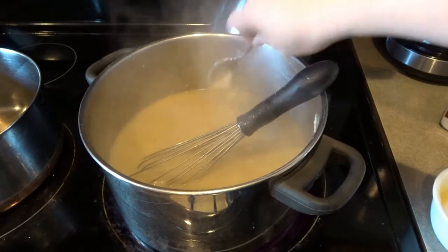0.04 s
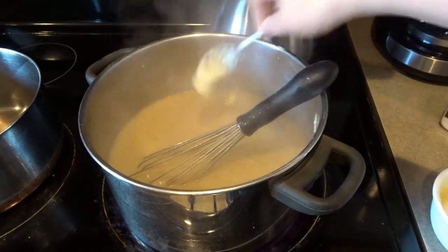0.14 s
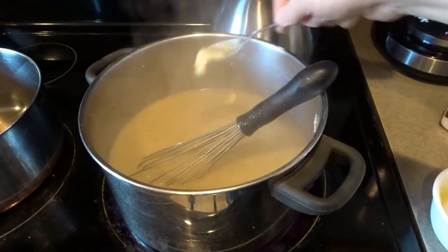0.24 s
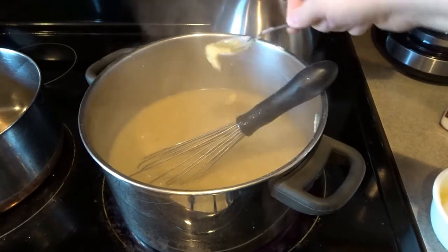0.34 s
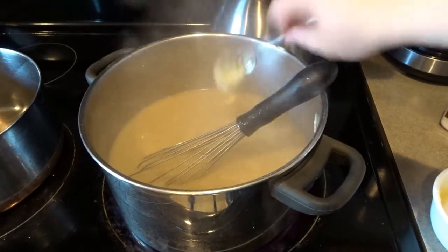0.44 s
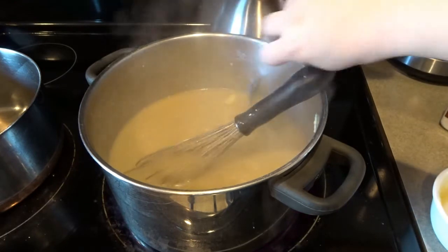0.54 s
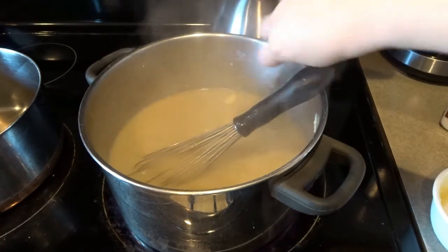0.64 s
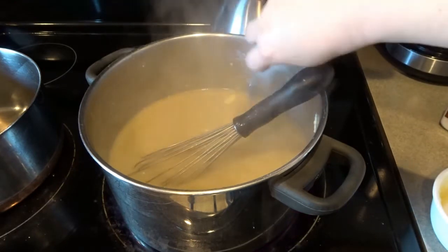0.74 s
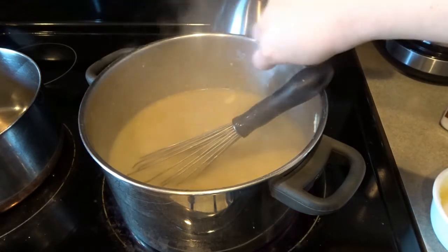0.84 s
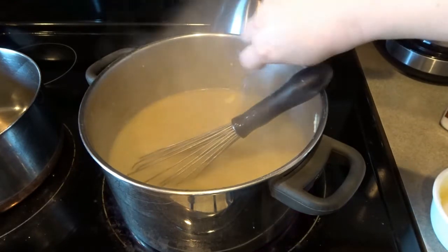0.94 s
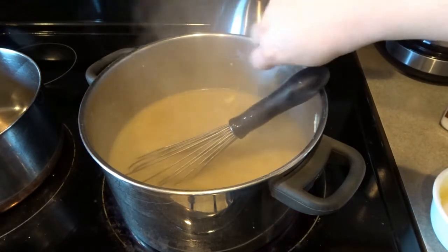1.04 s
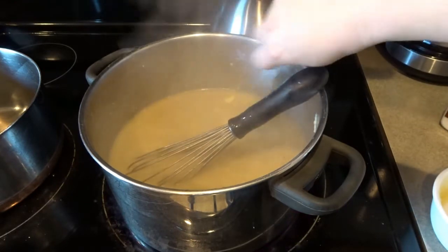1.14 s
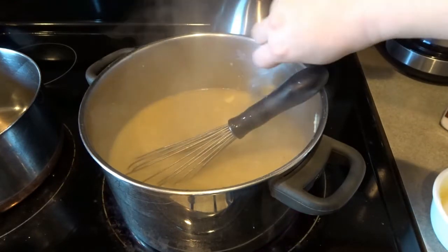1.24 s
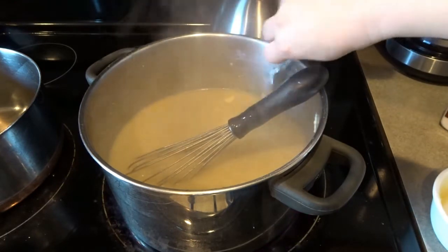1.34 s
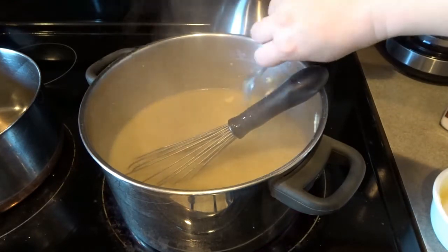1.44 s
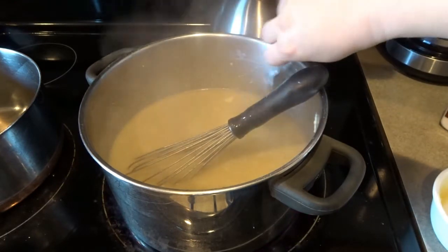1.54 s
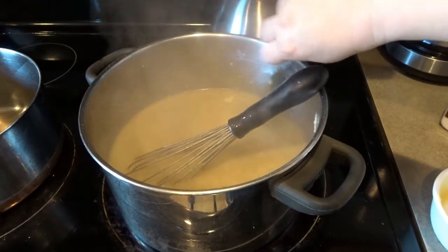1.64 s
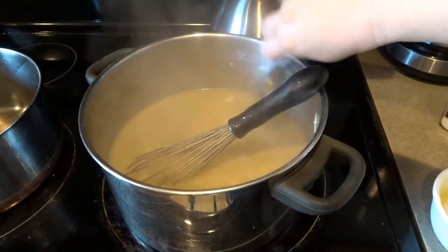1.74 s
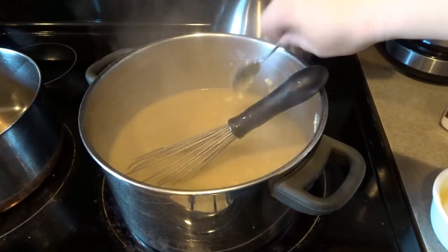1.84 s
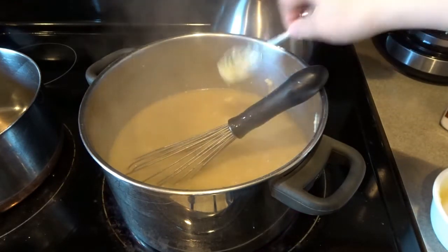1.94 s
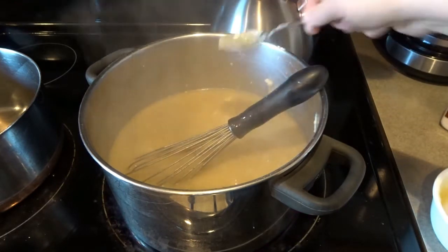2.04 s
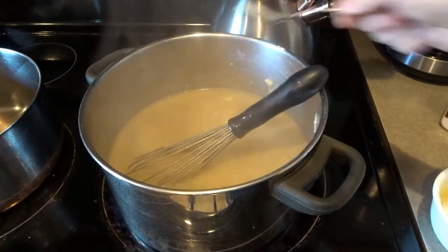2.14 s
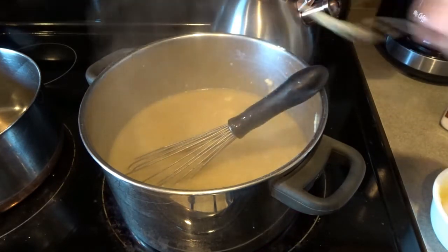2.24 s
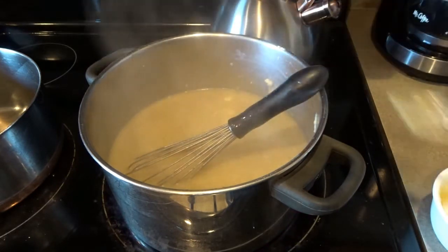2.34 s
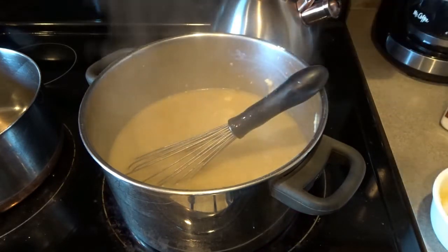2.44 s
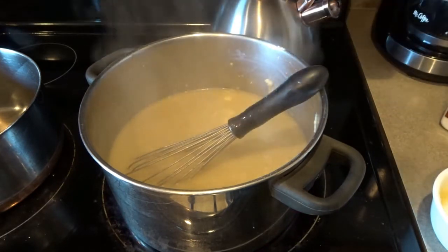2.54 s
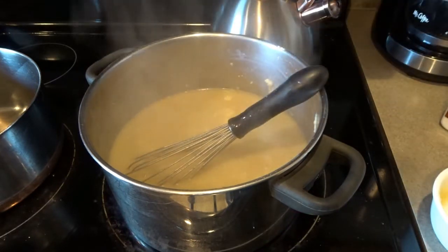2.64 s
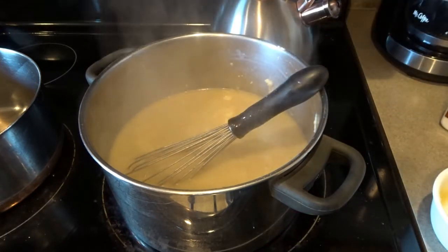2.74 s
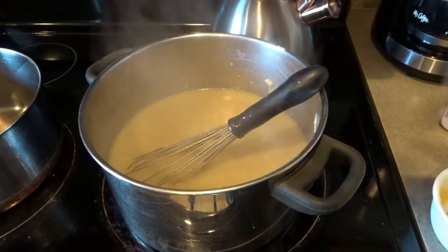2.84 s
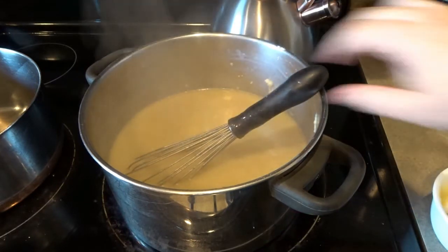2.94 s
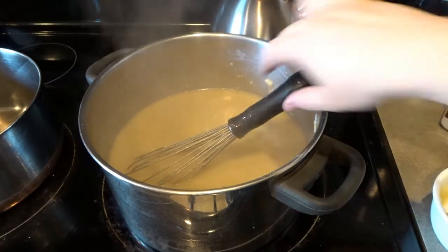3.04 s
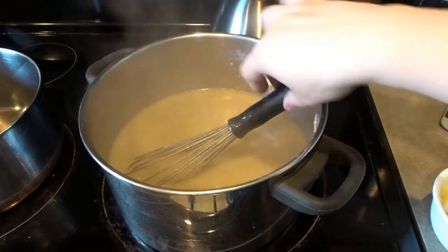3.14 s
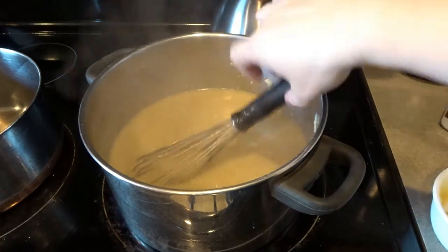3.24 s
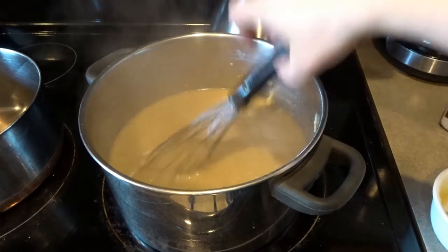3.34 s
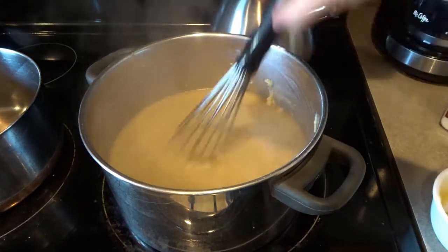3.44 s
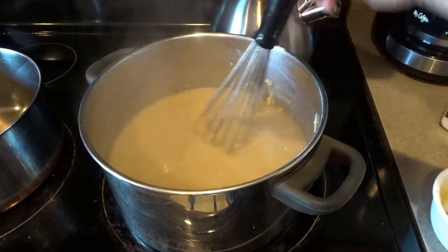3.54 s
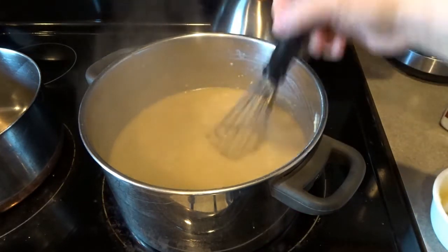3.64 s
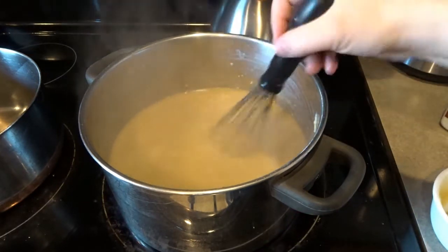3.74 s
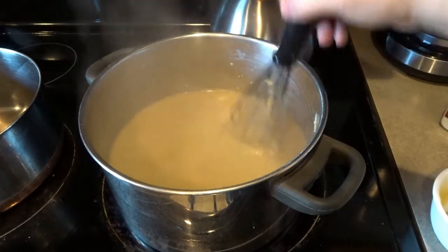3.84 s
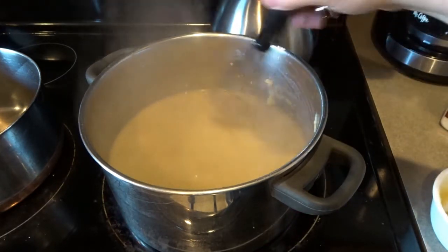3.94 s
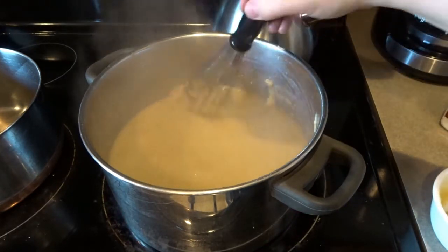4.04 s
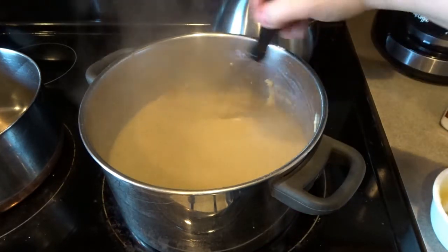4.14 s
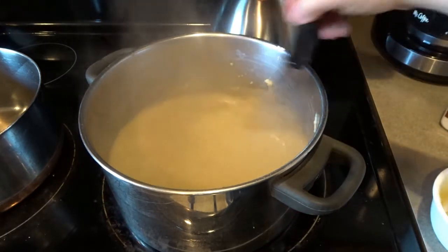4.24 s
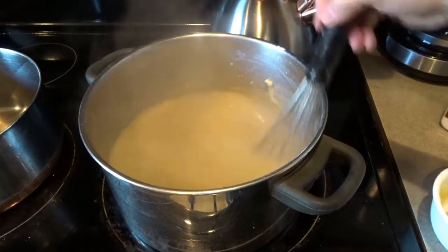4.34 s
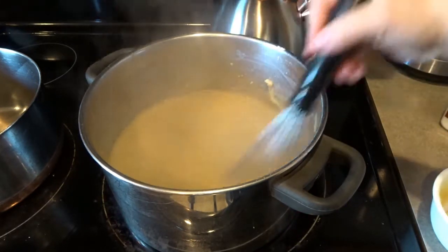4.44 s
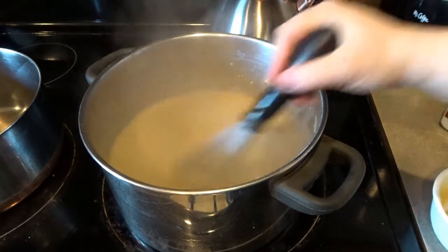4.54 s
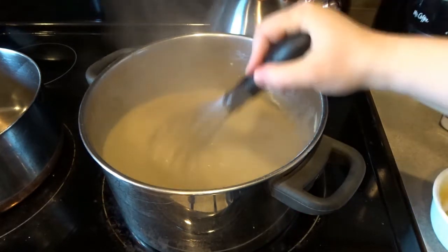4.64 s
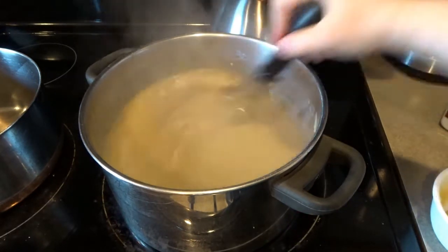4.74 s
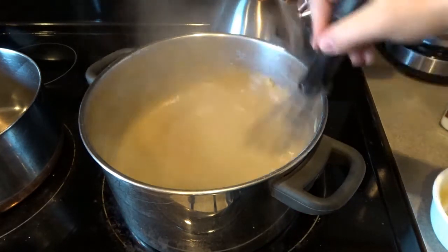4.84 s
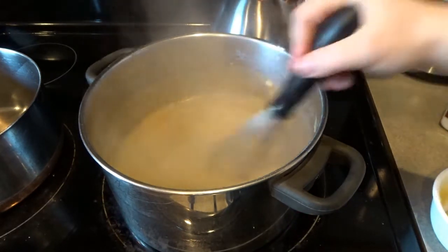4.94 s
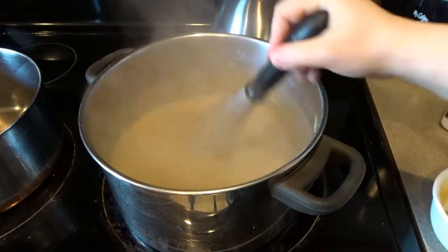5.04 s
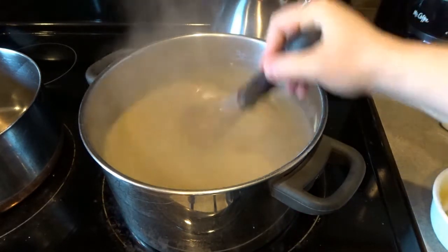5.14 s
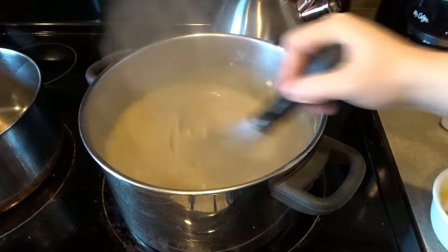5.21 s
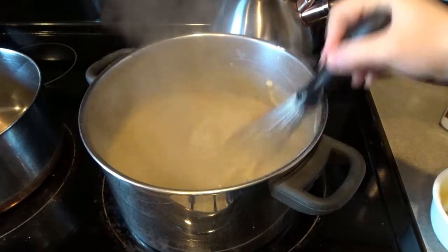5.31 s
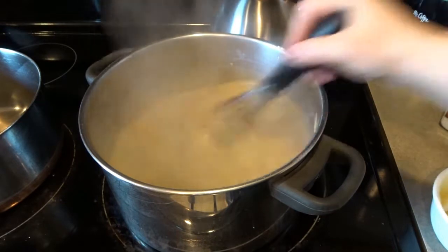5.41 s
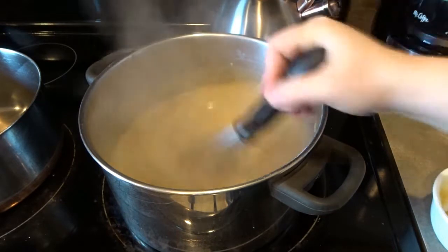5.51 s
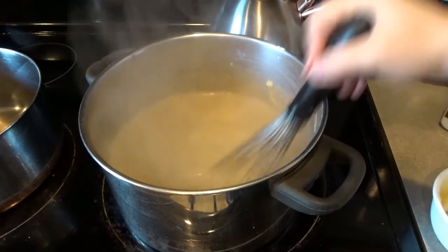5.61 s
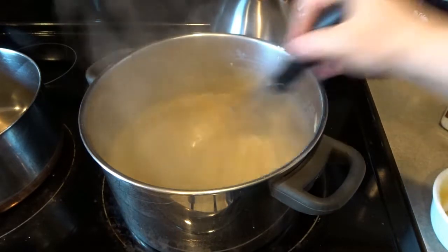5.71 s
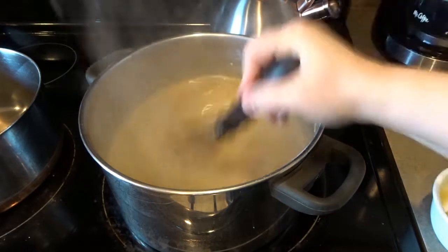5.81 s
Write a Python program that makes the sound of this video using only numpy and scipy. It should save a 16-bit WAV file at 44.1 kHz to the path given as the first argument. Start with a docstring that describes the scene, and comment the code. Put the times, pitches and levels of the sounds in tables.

```python
"""Spoon and whisk on a sauce pot

A spoon is rapped seven times on the rim of a steel pot of thick sauce and laid down; then a wire whisk knocks
the pot and scrapes round it. Blows are noise clicks and dying sines; scrapes are random slips through resonances.
The sauce ticks faintly with short sine pops over mains hum and shaped air noise. A noise tail is the small kitchen."""
import sys
import numpy as np
from scipy import signal
from scipy.io import wavfile
from scipy.ndimage import uniform_filter1d

SR = 44100
rng = np.random.default_rng(int(sys.argv[2]) if len(sys.argv) > 2 else 0)


def store_pcm(level_fs):
    """Save levels as 16-bit WAV."""
    pcm = np.round(np.clip(level_fs, -1, 1) * 32767).astype(np.int16)
    wavfile.write(sys.argv[1], SR, np.atleast_2d(pcm).T)


N = 259023
LEAD = SR // 5  # samples played before the start

# the lighter clack of wires and of the spoon landing: (frequency [Hz], relative level per Hz [dB])
CLACK = [(88, -68), (150, -16), (534, -7), (790, -2.5), (1120, -17.5), (1530, -7.5), (1720, -14.5),
         (2060, -8.5), (7620, -15), (16000, -26.5)]


def amp(db):
    """Decibels to a linear gain."""
    return 10 ** (np.asarray(db) / 20)


def evened(x):
    """Scales a sound to rms 1."""
    return x / np.sqrt(np.mean(x ** 2) + 1e-20)


def read(points, hz):
    """Reads a curve between its points on a log frequency scale."""
    f, value = np.transpose(points)
    return np.interp(np.log(hz + 1), np.log(f + 1), value)


def add(mix, s, sound):
    """Lays a sound into the mix at s seconds after the start."""
    part = mix[LEAD + round(s * SR):][:len(sound)]
    part += sound[:len(part)]


def causal(points, tilt_db):
    """The shortest click with the given spectrum (minimum phase), tilted round 2 kHz; energy 1."""
    hz = abs(np.fft.fftfreq(4096, 1 / SR))
    tilted_db = read(points, hz) + tilt_db * np.log2((hz + 50) / 2000)
    log_gain = np.log(amp(np.maximum(tilted_db, -100)))
    taps = np.fft.ifft(np.exp(np.conj(signal.hilbert(log_gain)))).real[:2048]
    return taps / np.linalg.norm(taps)


def ring(hz, db, t60, phase):
    """Dying sines that swell in over a few cycles; energy 1."""
    t = np.arange(SR // 2)[:, None] / SR
    decay = amp(db - 60 * t / t60)
    swell = 1 - np.exp(-t * hz / 2.5)
    out = (decay * swell * np.sin(2 * np.pi * (hz * t + phase))).sum(1)
    return out / np.linalg.norm(out)


def struck(modes, tilt_db, spread_db):
    """The modes of a body, shared out a little differently at each blow."""
    hz, db, t60 = np.transpose(modes)
    share, phase = rng.standard_normal((2, len(hz)))
    return ring(hz, db + tilt_db * np.log2(hz / 2000) + spread_db * share, t60, phase)


def landing(seconds):
    """The force of many small contacts that swells, peaks after the given time and fades; energy 1."""
    u = np.arange(3000) / SR / seconds
    burst = rng.standard_normal(3000) * u * np.exp(-u)
    return burst / np.linalg.norm(burst)


def clatter(points, tilt_db, seconds):
    """A broad click drawn out over the time of contact."""
    return signal.fftconvolve(landing(seconds), causal(points, tilt_db))


def slow(seconds, shape):
    """Random drift smoothed along the last axis, rms 1 overall."""
    span = max(round(seconds * SR), 1)
    smooth = uniform_filter1d(rng.standard_normal(shape), span)
    return evened(uniform_filter1d(smooth, span))


def pair(same, frames):
    """Random short-time spectra for left and right, as alike at each frequency as the curve says."""
    a, b, c, d = rng.standard_normal((frames, 513, 4)).T
    like = read(same, np.fft.rfftfreq(1024, 1 / SR))[:, None]
    mid = np.sqrt(1 + like) * (a + 1j * b)
    side = np.sqrt(1 - like) * (c + 1j * d)
    return np.array([mid + side, mid - side])


def kitchen(x, wet_db, left_db):
    """The direct sound, then a dense tail that builds in a few ms, each band dying at its own speed."""
    # how alike the echoes are at the two sides: (frequency [Hz], left-right likeness [-1 to 1])
    echo_likeness = [(300, 1), (700, 0.88), (1500, 0.717), (3000, 0.28), (7000, 0.067)]
    # how long the room rings: (frequency [Hz], time to fall 60 dB [s])
    room_decay = [(200, 0.43), (530, 0.32), (1390, 0.4317), (3680, 0.38), (9700, 0.37), (15000, 0.36)]
    t = np.arange(30000) / SR
    noise = signal.istft(pair(echo_likeness, 130), nperseg=1024, noverlap=768)[1][:, :len(t)]
    hz, frame_s, z = signal.stft(noise, SR, nperseg=128)
    dying = z * amp(-60 * frame_s / read(room_decay, hz)[:, None])
    tail = signal.istft(dying, SR, nperseg=128)[1][:, :len(t)]
    tail = tail * np.clip((t - 0.0005) / 0.0043, 0, 1)
    wet = signal.fftconvolve(x[None], tail / np.linalg.norm(tail[0]), axes=1)[:, :len(x)]
    balance = amp([[left_db / 2], [-left_db / 2]])  # left_db is left over right
    return ((x + amp(wet_db) * wet) * balance)[:, LEAD:]


def resonate(x, hz, width):
    """Shifts the curve hz down to zero, smooths, and shifts back: a resonance of gain 1."""
    turn = np.exp(2j * np.pi * np.cumsum(hz) / SR)
    r = np.exp(-np.pi * width / SR)
    return 2 * (turn * signal.lfilter([1 - r], [1, -r], x / turn)).real


def scrape(t, pressure_db, tilt_db, modes, song_db, fickle_db, uneven_db, bend):
    """Dense slips of uneven size give a rasp and ring the modes, each mode singing out now and then."""
    # the broad rasp of metal dragged on metal: (frequency [Hz], relative level per Hz [dB])
    rasp_spectrum = [(240, -49), (400, -7.5), (528, 4.5), (588, -20), (697, -4), (1110, -8), (1290, -7),
                     (2220, -7), (9920, -7), (16000, -12)]
    hz, width, db = np.transpose(modes)
    each_mode = (len(hz), len(t))

    sizes = amp(uneven_db * np.minimum(rng.exponential(1, len(t)), 4))
    slipping = rng.random(len(t)) < 6000 / SR  # about 6000 slips a second
    slips = rng.choice([-1., 1.], len(t)) * sizes * slipping
    slips = evened(slips) * amp(2.2 * slow(0.012, len(t)))  # slips come in clumps

    mode_tilt_db = tilt_db * np.log2(hz[:, None] / 5000)
    sing = amp(db[:, None] + fickle_db * slow(0.015, each_mode) + mode_tilt_db)
    bent = hz[:, None] * (1 + bend * slow(0.047, each_mode))  # pressing changes the pitch
    tones = sum(resonate(slips * g, f, w) for g, f, w in zip(sing, bent, width))

    bright = np.clip(0.5 + tilt_db / 6, 0, 1)  # a blend of a dull and a bright rasp
    dull_rasp, bright_rasp = (signal.oaconvolve(slips, causal(rasp_spectrum, d))[:len(t)] for d in (-3, 3))
    rasp = (1 - bright) * dull_rasp + bright * bright_rasp
    rubbed = evened(rasp + amp(song_db) * evened(tones))
    return amp(pressure_db) * rubbed * signal.windows.tukey(len(t), min(600 / len(t), 1))


def knocks():
    """The wires land one after another, so the clack is a short burst; the damped floor thuds and one wire clinks."""
    # whisk knocks on the pot, the first just before the start:
    # (time [s], blow [dB], brightness [dB per octave], clink [Hz], relative clink level [dB])
    whisk_knocks = [(-0.12, -17, 0.5, 6770, -6), (3.574, -16, -0.3, 820, -5), (3.965, -17, 3, 1070, -10),
                    (4.054, -29.5, 3.5, 3740, -8), (4.141, -30, 2, 4520, -8), (4.244, -36, 2, 6680, 6),
                    (4.303, -37, 0, 6710, 2), (4.374, -24, 0.5, 815, -24), (4.437, -29, 1.9, 1580, -17.5),
                    (4.655, -32, 2, 3740, -11), (4.695, -30, 1.5, 653.5, -14),
                    (5.267, -37.5, 0.5, 3350, -4), (5.381, -25, 2, 720, -10), (5.712, -21, 1.5, 676, -10)]
    # the floor of the pot under the sauce: (frequency [Hz], relative level [dB], time to fall 60 dB [s])
    floor_modes = [(126, 4, 0.076), (402, 7, 0.047), (752, -0.5, 0.069), (854, 0.5, 0.059),
                   (1112, -1, 0.028), (1305, -2, 0.0655), (1540, -1, 0.0277), (2027, 5, 0.027),
                   (2474, -14, 0.114), (2760, -7, 0.024), (3380, -1.5, 0.04)]
    light_db, light_landing_s = -30, 0.0028  # a light blow, and how long its wires take to reach full force
    longer_db_per_db = 0.08  # hard knocks bring down more wires
    thud_db, thud_db_per_brightness = 14.5, -3  # glancing, bright knocks move the floor of the pot less
    out = np.zeros(N + LEAD)
    for s, db, tilt_db, hz, clink_db in whisk_knocks:
        seconds = light_landing_s * amp(longer_db_per_db * (db - light_db))
        thud = amp(thud_db + thud_db_per_brightness * tilt_db) * struck(floor_modes, tilt_db, spread_db=0.5)
        tones = thud + amp(clink_db + 23.5) * ring(hz, 0, 0.029, 0)
        u = np.arange(len(tones)) / SR / seconds
        build = 1 - (1 + u) * np.exp(-u)  # builds while the wires land
        add(out, s, amp(db + 14.5) * clatter(CLACK, tilt_db, seconds))
        add(out, s, amp(db + 1.5) * tones * build)
    return kitchen(out, wet_db=0.1, left_db=-0.64)


def air():
    """Steady low noise with faint patches, and the mains hum, wavering a little."""
    # colour of the air noise: (frequency [Hz], relative level per Hz [dB])
    air_spectrum = [(25, -31), (80, -17), (150, -9), (220, -1.5), (290, 1), (470, -7), (540, -3), (630, -9),
                    (1000, -11.5), (1150, -16.5), (2000, -22), (3200, -28), (6300, -30.5), (10000, -37),
                    (14000, -42), (16000, -59)]
    # width of the air noise: (frequency [Hz], left-right likeness [-1 to 1])
    air_likeness = [(60, 0.94), (180, 1), (550, 0.94), (1650, 0.44), (4970, 0.0), (15000, 0)]
    # mains hum before its wavering: (frequency [Hz], rms level [dB])
    hum_tones = [(59.6, -62.5), (120, -55.5), (179.5, -56)]
    z = pair(air_likeness, N // 256 + 5)
    patches = uniform_filter1d(rng.standard_normal(z.shape[1:]), 10, 0)  # blurred over frequency
    patches = evened(uniform_filter1d(patches, 12, 1))  # and over time
    z = z * amp(read(air_spectrum, np.fft.rfftfreq(1024, 1 / SR))[:, None] + 0.99 * patches)
    noise = amp(-48.5) * evened(signal.istft(z, nperseg=1024, noverlap=768)[1][:, :N])
    t = np.arange(N) / SR
    hum = np.zeros(N)
    for hz, db in hum_tones:
        level = amp(db + 2.0 * slow(0.031, N)) * np.sqrt(2)
        hum += level * np.sin(2 * np.pi * (hz * t + rng.random()))
    return noise + hum


def pops():
    """Short ticks of a few sine cycles, mostly bubbles bursting on the sauce; many fainter ones come at random."""
    # short plain ticks: bubbles, and at 3.68 s a small clink of the whisk:
    # (time [s], relative level [dB], pitch [Hz])
    plain_ticks = [(0.012, -36.5, 6300), (0.1715, -44, 4950), (0.3247, -42, 7000), (1.8687, -39, 5200),
                   (1.9526, -43, 5080), (2.3635, -41.5, 5500), (2.8078, -35, 5930), (2.9092, -43, 5800),
                   (3.0747, -40, 5240), (3.3045, -50, 5170), (3.6804, -33.5, 5200), (3.7938, -40.5, 6470),
                   (3.8482, -40, 5150)]
    out, t = np.zeros(N + LEAD), np.arange(200) / SR
    # 60 faint ones anywhere in time, from -62.5 to -54.5 dB and from 3500 to 8500 Hz
    faint = rng.random((60, 3)) * [N / SR, 8., 5000] + [0, -62.5, 3500]
    shape = np.exp(-t / 0.00061) * (1 - np.exp(-t / 0.00015))
    for s, db, hz in list(plain_ticks) + list(faint):
        add(out, s, amp(db) * np.sin(2 * np.pi * hz * t) * shape)
    return kitchen(out, wet_db=-0.5, left_db=-1.0)


def rubbing():
    """Metal rubs lightly on the rim and sets it singing; each rub swells and fades."""
    # the spoon, and later the whisk handle, on the rim:
    # (start [s], length [s], firmest level [dB], brightness [dB per octave])
    rim_rubs = [(0.255, 0.06, -61.5, 16), (0.43, 0.06, -66, -1.5), (0.505, 0.068, -67, -1.7),
                (3.125, 0.18, -55, 0.1)]
    # resonances of the rubbed rim: (frequency [Hz], width [Hz], relative level [dB])
    rim_modes = [(2150, 72, -16.5), (2600, 41, -5.5), (3450, 66, 1.5), (4450, 56, -9), (5660, 110, -9.5),
                 (7100, 51, -3), (8460, 130, -8.5), (10000, 59, -12.5), (10500, 40, -8.5),
                 (12500, 130, -14.5), (13674, 70, -16), (15400, 33, -15)]
    firmest_at, ends_db = 0.23, -21  # share of the length; level of the ends under the firmest
    out = np.zeros(N + LEAD)
    for s, length, peak_db, tilt_db in rim_rubs:
        t = np.arange(0, length, 1 / SR)
        pressure_db = peak_db + np.interp(t / length, [0, firmest_at, 1], [ends_db, 0, ends_db])
        rub = scrape(t, pressure_db, tilt_db, rim_modes, song_db=8.0, fickle_db=1.0, uneven_db=5.0, bend=0.0097)
        add(out, s, rub)
    return out


def raps():
    """A bright tick reaches the ear first; the crack is heard mostly off the walls, with the ring of the pot."""
    # spoon raps on the rim: (time [s], blow [dB], brightness [dB per octave])
    rim_raps = [(0.5718, -7, -2.5), (0.7286, -5.5, -0.8), (0.9018, -3.5, -0.64), (1.0771, -3, 0),
                (1.249, -3.5, 0.5), (1.4253, -4, 0.46), (1.5775, -6, 0)]
    # the broad sound of metal on metal: (frequency [Hz], relative level per Hz [dB])
    crack_spectrum = [(88, -54.5), (150, -25.5), (235, -21.5), (475, -19.5), (624, -5.5), (1480, -16.5),
                      (2180, -12), (2980, -12.5), (6640, -10), (10000, -21), (16000, -26)]
    # the first instant of a rap: (frequency [Hz], relative level [dB])
    tick_tones = [(4300, 0.5), (5500, -0.5), (6400, 5), (7500, 0), (10500, -7.5)]
    # the wall of the pot, with its close pairs: (frequency [Hz], relative level [dB], time to fall 60 dB [s])
    wall_modes = [(246.3, -1, 0.27), (327.7, -8, 0.42), (602, 2.5, 0.29), (643, 0.5, .3), (645, -1, 0.32),
                  (729, -5, 0.25), (733, -9, 0.25), (840, -7, 0.3), (850, -2, 0.4), (955, -7.5, 0.22),
                  (1000, -10, 0.23), (560, -7.5, 0.25), (1645, -8, 0.33), (2150, -1, 0.3), (2127, -11, .3),
                  (2486, -6, 0.28), (2830, -17, 0.33), (3217, -3.5, 0.22), (3286, -3, 0.16),
                  (4350, -0.5, 0.17), (5220, -9, 0.23), (5200, -14, .28), (5370, -4.5, 0.22),
                  (6500, 0.5, 0.11), (6500, -2.5, 0.25), (6692, -5, 0.24), (5801, -2.5, 0.3),
                  (7110, 0, 0.17)]
    cracks, rings = np.zeros(N + LEAD), np.zeros(N + LEAD)
    hz, tick_db = np.transpose(tick_tones)
    for s, db, tilt_db in rim_raps:
        add(cracks, s, amp(db - 4.0) * causal(crack_spectrum, tilt_db))
        # the spoon chatters, never twice alike
        add(cracks, s, amp(db - 16.0) * clatter(crack_spectrum, tilt_db, 0.0048))
        add(rings, s, amp(db + 7.5) * ring(hz, tick_db, 0.0038, 0))
        add(rings, s, amp(db + 12.5) * struck(wall_modes, tilt_db, spread_db=2.5))
    return kitchen(cracks, wet_db=23.5, left_db=-0.36) + kitchen(rings, wet_db=-8.0, left_db=-2.0)


def spoon():
    """The spoon is laid down: each bounce stops most of the last ring, starts a new one and thuds on the rest."""
    # the bounces: (time [s], blow [dB], brightness [dB per octave])
    bounces = [(2.5992, -19, -1), (2.6066, -24, 0), (2.617, -21, -8), (2.624, -24.5, 2), (2.635, -26, 0),
               (2.655, -40, -10), (2.678, -48.5, -3)]
    # ring of the spoon: (frequency [Hz], relative level [dB], time to fall 60 dB [s])
    spoon_modes = [(1160, -16.5, 0.072), (1600, -15, 0.1), (2310, -15, 0.095), (2648, -15, 0.095),
                   (3120, -21, .4), (3815, -13, 0.126), (5712, 3, 0.38), (5740, 5, 0.17), (5990, -4, 0.11),
                   (7340, -31, 0.11), (8915, -19, 0.17), (9200, -14, 0.19), (10460, -14.5, 0.17),
                   (12020, -20, .09)]
    out, times = np.zeros(N + LEAD), [row[0] for row in bounces]
    for (s, blow_db, tilt_db), gap in zip(bounces, np.diff(times, append=N / SR)):
        tone = struck(spoon_modes, tilt_db, spread_db=1.5)
        tone = tone * np.interp(np.arange(len(tone)) / SR, [gap - 0.002, gap], [1, 0.3])
        # the hollow thud of what it lands on, near 468 Hz and gone in 20 ms
        thud = ring(468 * rng.uniform(0.96, 1.064), 0, 0.02, 0)
        add(out, s, amp(blow_db + 19.0) * tone)
        add(out, s, amp(blow_db + 9.5) * thud)
        add(out, s, amp(blow_db + 9.0) * clatter(CLACK, 0.14, 0.0024))
    song = ring(3085, 0, 0.34, 0)  # the last rock sets the bowl of the spoon singing
    add(out, 2.678, amp(-48) * song / song.max())
    return kitchen(out, wet_db=2.5, left_db=-1.0)


def stirring():
    """One long scrape of the wires, with single wires catching and springing free at random."""
    # the whisk goes round, its wires pressed on the steel and eased at the turns: (time [s], pressure [dB])
    stir_pressure = [(3.99, -64), (4.05, -64), (4.1, -45), (4.224, -47.5), (4.26, -45.5), (4.34, -56),
                     (4.402, -46.5), (4.554, -44), (4.6, -49), (4.874, -42.5), (4.9, -49), (4.994, -42),
                     (5.05, -53.5), (5.114, -41), (5.36, -47), (5.4, -39.5), (5.48, -41), (5.51, -45),
                     (5.63, -39), (5.7, -40.5), (5.73, -36.5), (5.87, -41.5)]
    # (time [s], brightness [dB per octave])
    stir_brightness = [(3.99, 0.5), (4.35, -2), (4.55, 0.48), (5.87, 1.5)]
    # resonances of the scraping wires: (frequency [Hz], width [Hz], relative level [dB])
    wire_modes = [(1290, 92, 2.5), (1990, 110, -0.5), (2590, 33.5, -11), (3289, 180, -1), (3900, 27, 9.5),
                  (4420, 140, -2), (5350, 770, -4), (6770, 78, 6.5), (7500, 320, -10.5), (8412, 120, 4),
                  (9900, 110, 1), (10900, 220, -4), (12160, 96, -18.5), (13200, 200, 3), (14450, 200, -18)]
    glints_per_s, glint_t60 = 40, 0.03  # 1/s, s
    glint_db, glint_range_db = 14.55, 7.1  # the least glint against the pressure, and how much more the largest has
    out, t = np.zeros(N + LEAD), np.arange(stir_pressure[0][0], N / SR, 1 / SR)
    pressure_db = np.interp(t, *np.transpose(stir_pressure))
    tilt_db = np.interp(t, *np.transpose(stir_brightness))
    rasp = scrape(t, pressure_db, tilt_db, wire_modes, song_db=-9.5, fickle_db=8.0, uneven_db=2.5, bend=0.036)
    add(out, t[0], rasp)
    for when, wire, detune, size in rng.random((round(glints_per_s * len(t) / SR), 4)):
        at = int(when * len(t))
        gain = amp(pressure_db[at] + glint_db + glint_range_db * size)
        hz = wire_modes[int(wire * len(wire_modes))][0] * (1 + 0.097 * (detune - 0.5))
        add(out, t[at], gain * ring(hz, 0, glint_t60, 0))
        add(out, t[at], gain * amp(-1.0) * causal(CLACK, 2.3))  # the tick as the wire springs free
    return out


def scene():
    """All the layers together, the two kinds of scrape sharing one room tail."""
    scrapes = kitchen(stirring() + rubbing(), wet_db=-0.5, left_db=-0.5)
    return knocks() + air() + pops() + raps() + spoon() + scrapes


def record(dry):
    """The band limit: a steep low-pass at 15.9 kHz."""
    return signal.oaconvolve(dry, signal.firwin(511, 15900, window=("kaiser", 9), fs=SR)[None], "same")


dry = scene()
out = record(dry)
store_pcm(out)
```